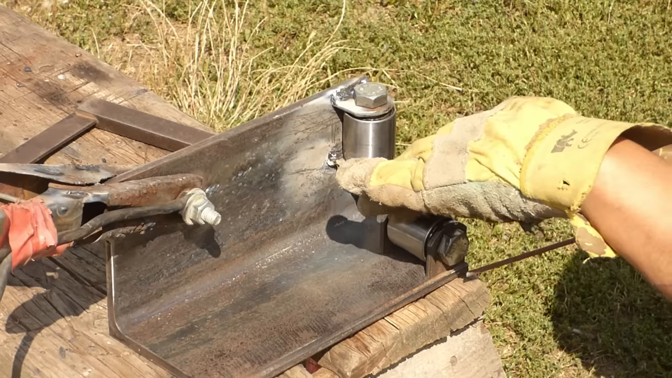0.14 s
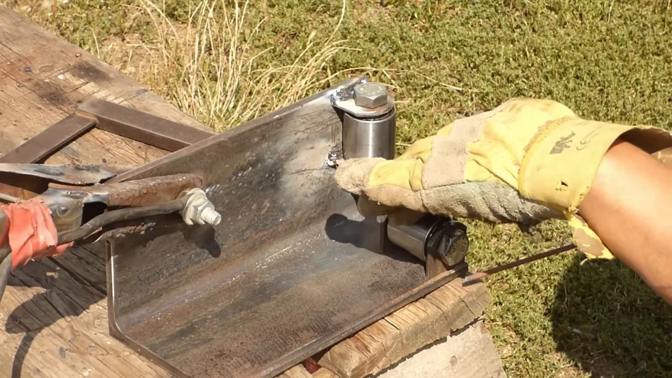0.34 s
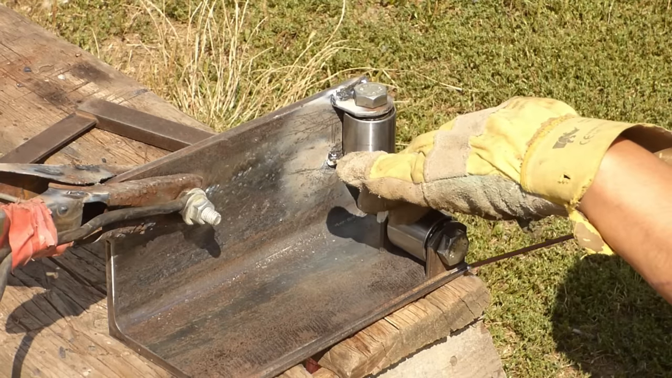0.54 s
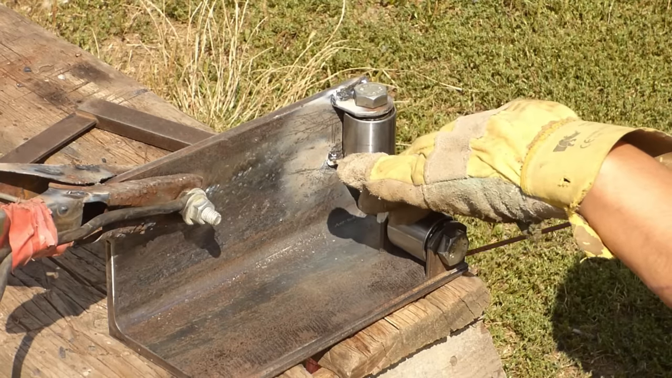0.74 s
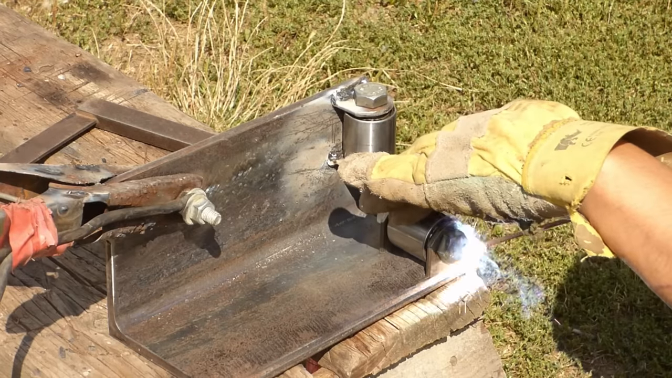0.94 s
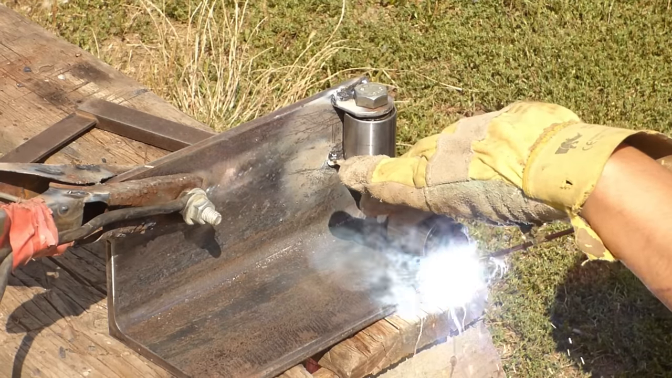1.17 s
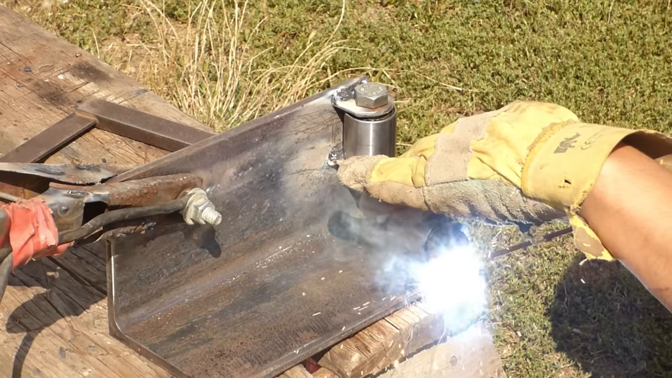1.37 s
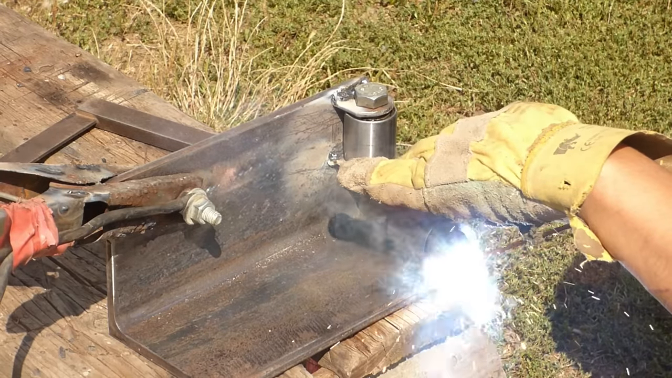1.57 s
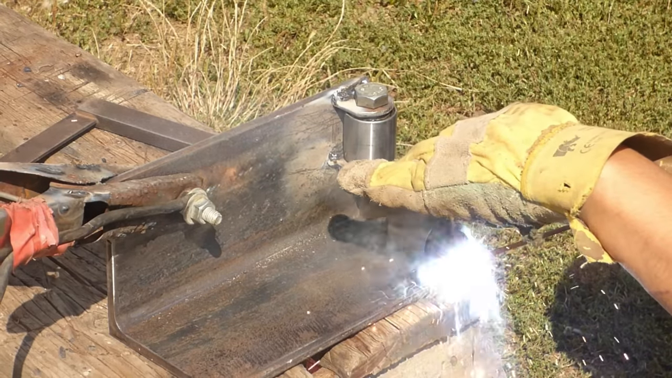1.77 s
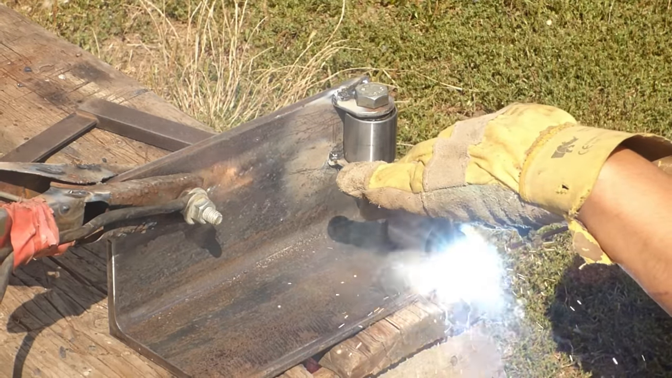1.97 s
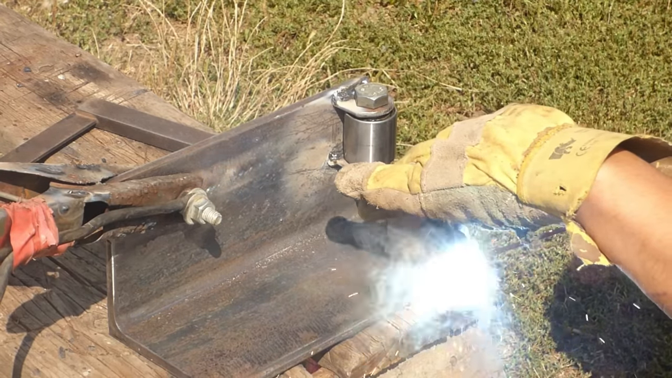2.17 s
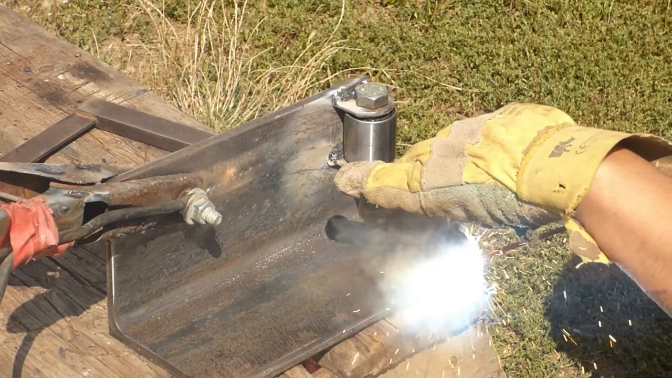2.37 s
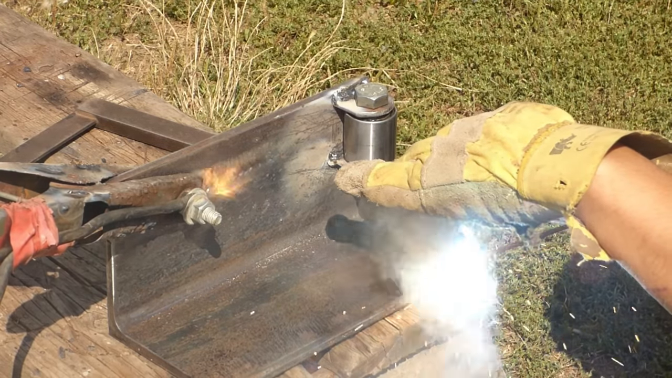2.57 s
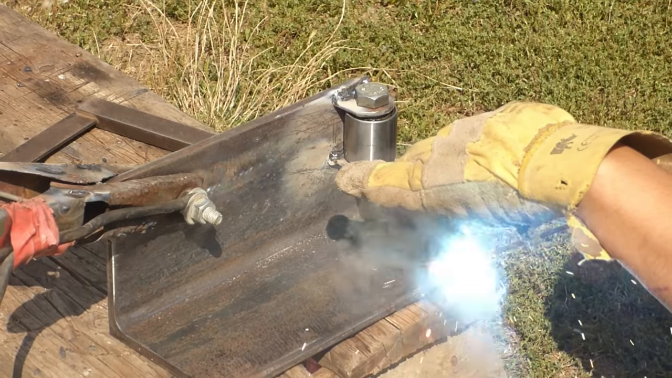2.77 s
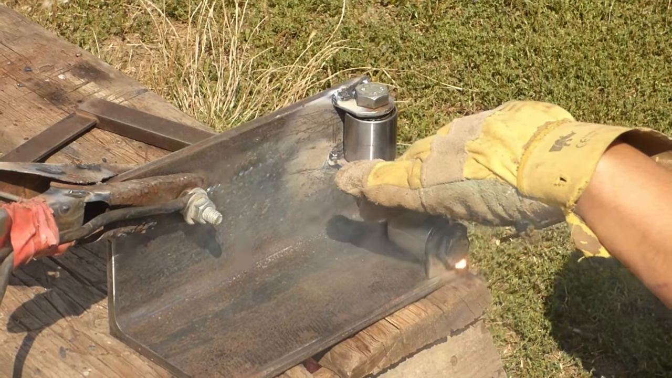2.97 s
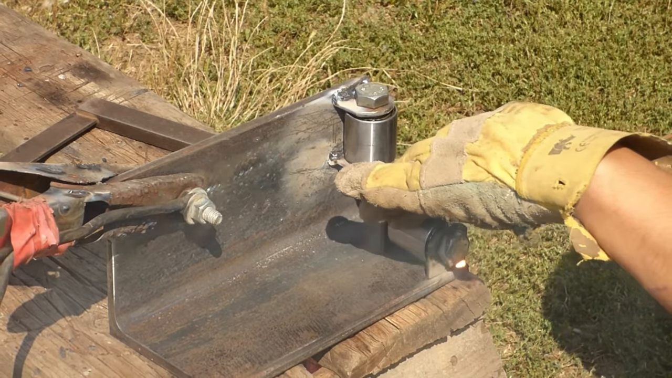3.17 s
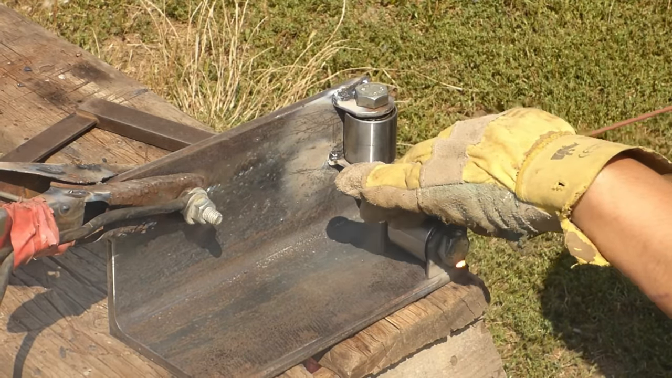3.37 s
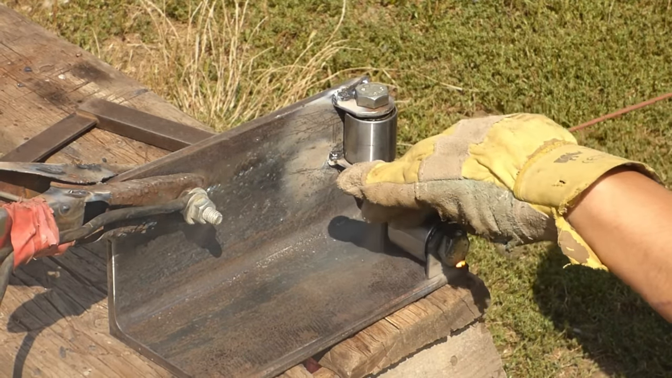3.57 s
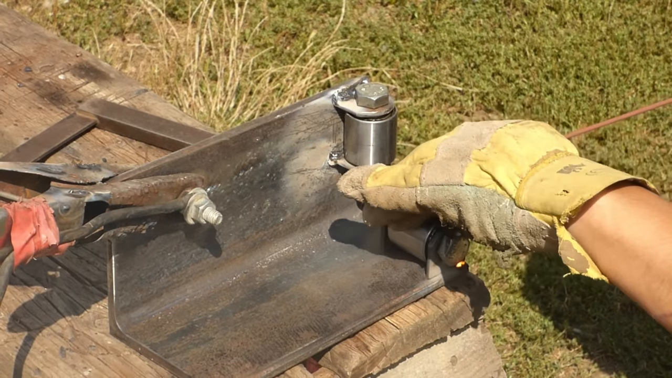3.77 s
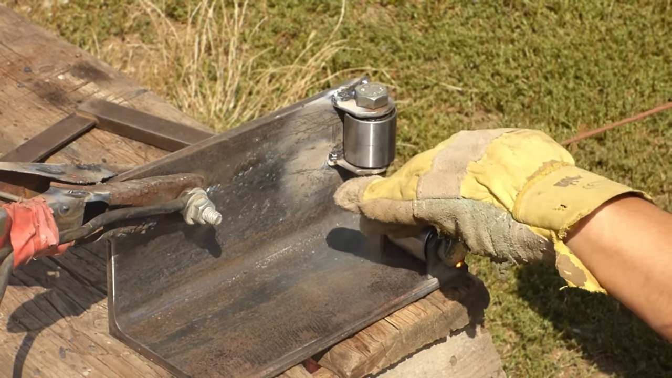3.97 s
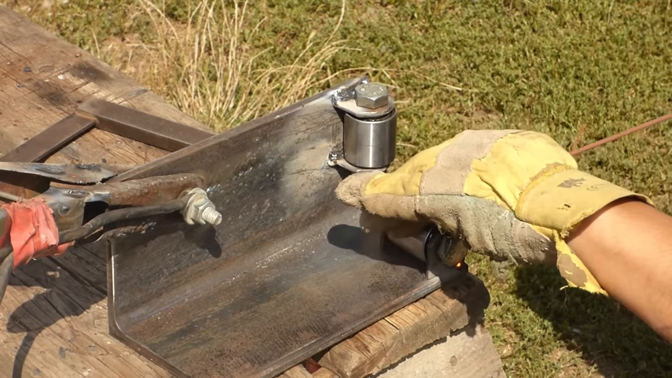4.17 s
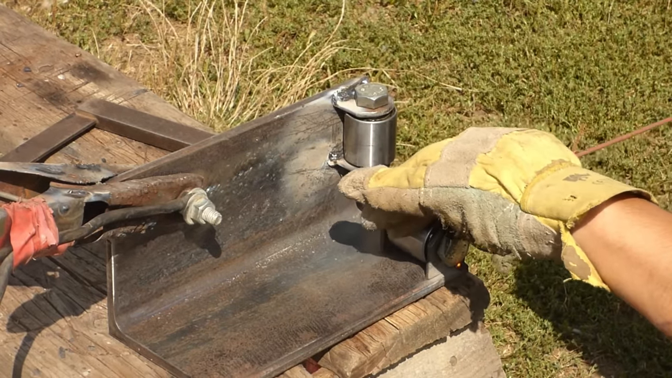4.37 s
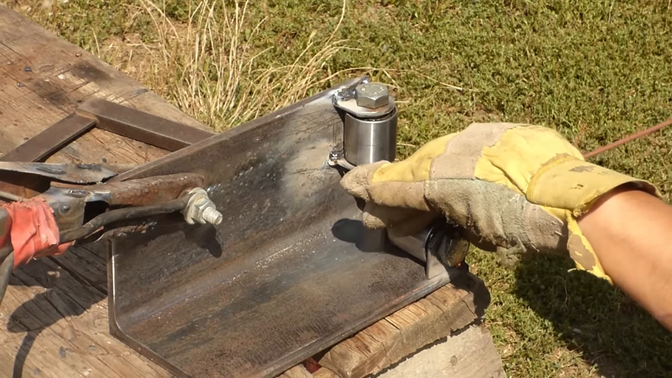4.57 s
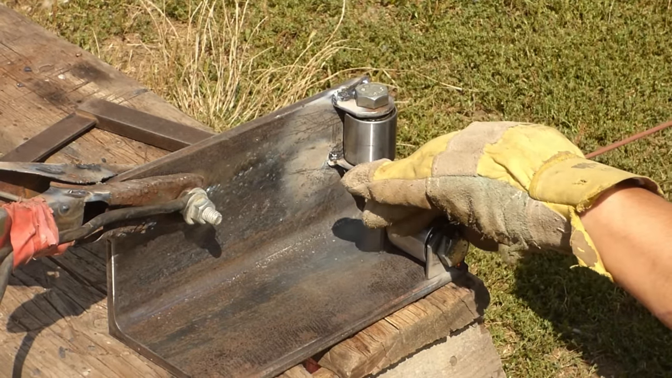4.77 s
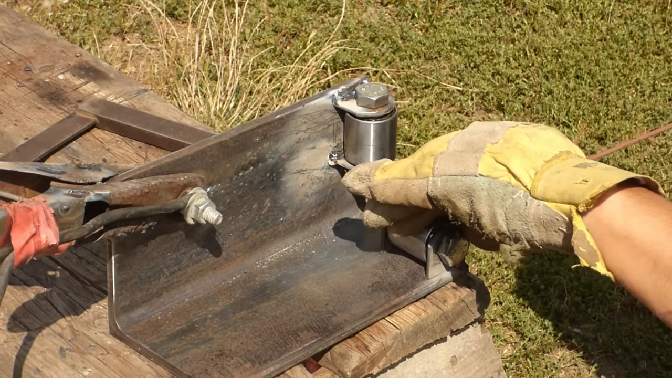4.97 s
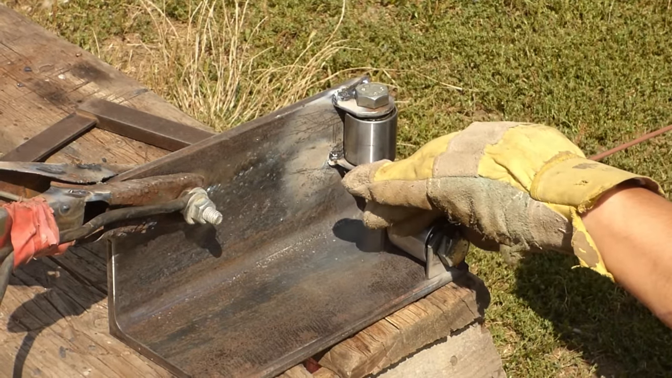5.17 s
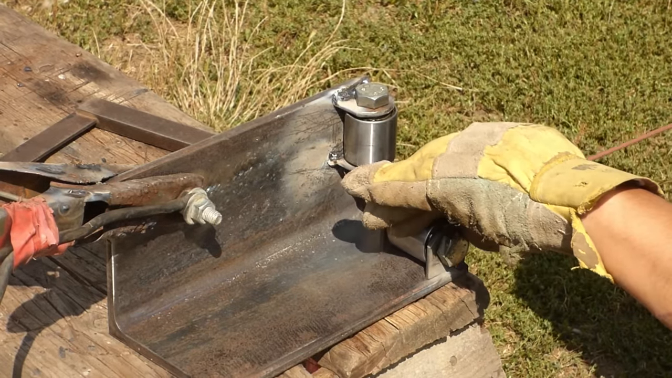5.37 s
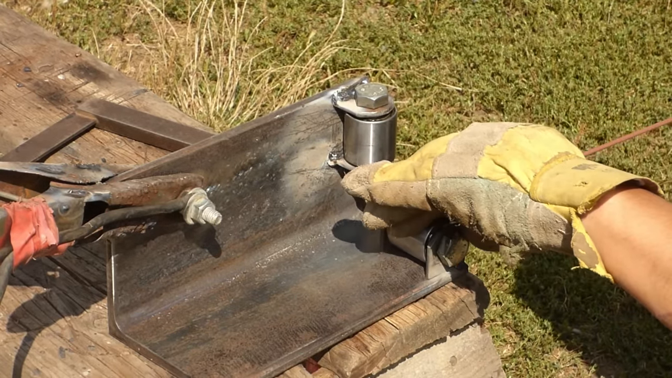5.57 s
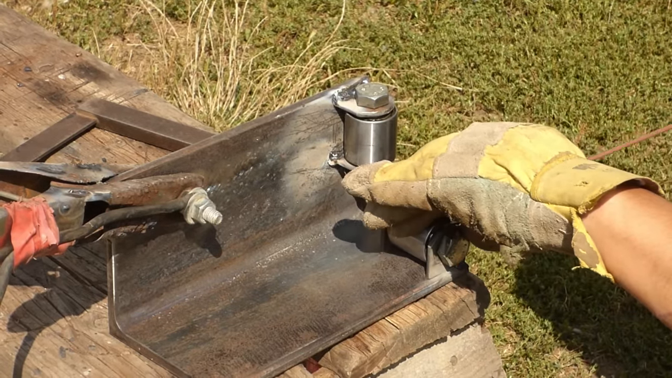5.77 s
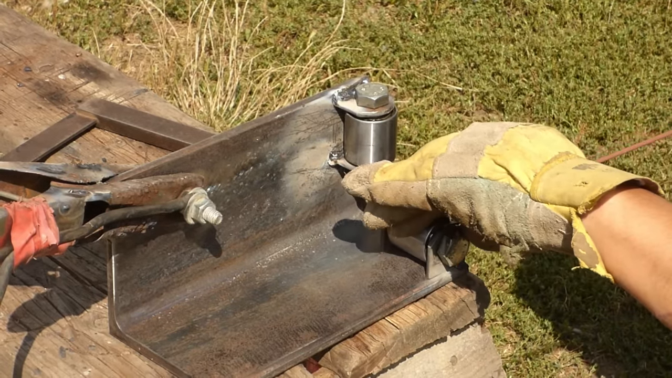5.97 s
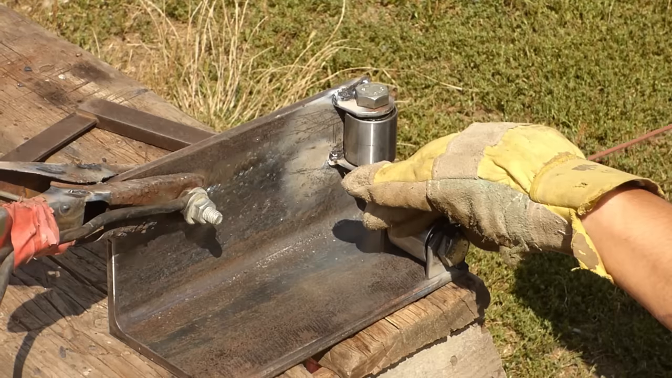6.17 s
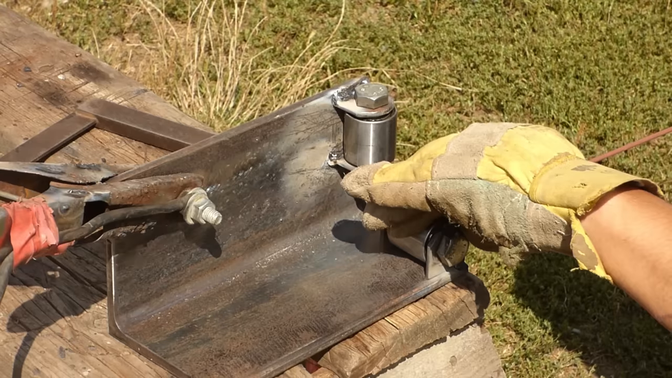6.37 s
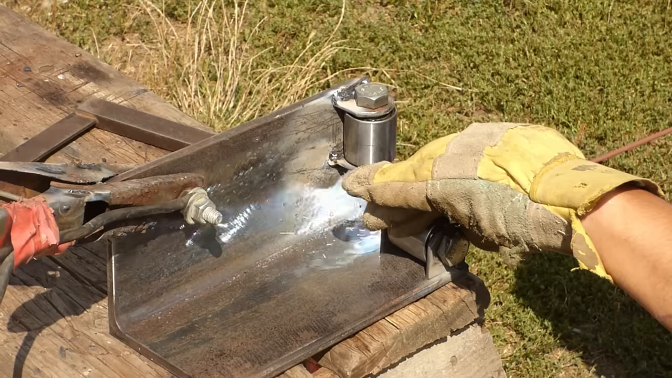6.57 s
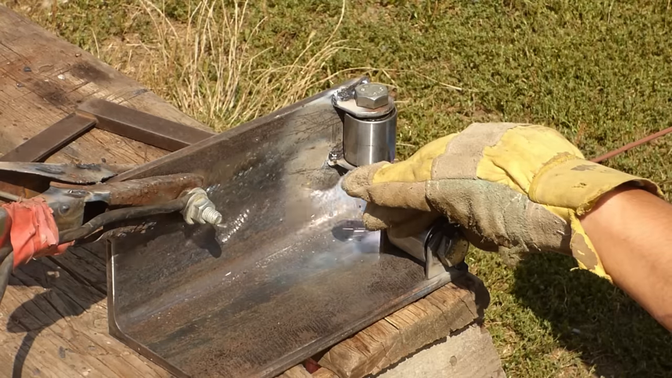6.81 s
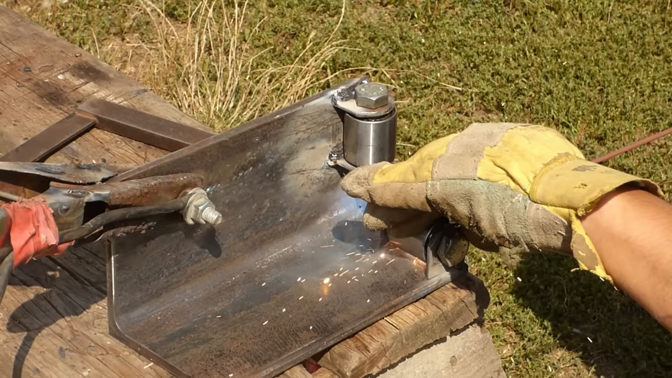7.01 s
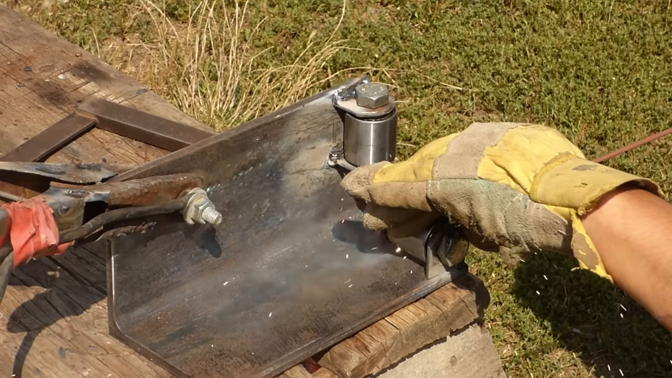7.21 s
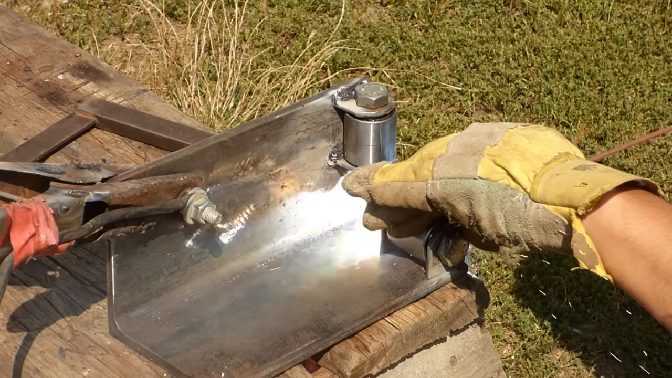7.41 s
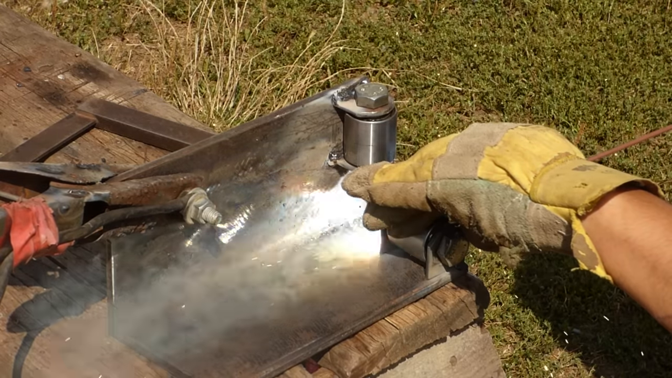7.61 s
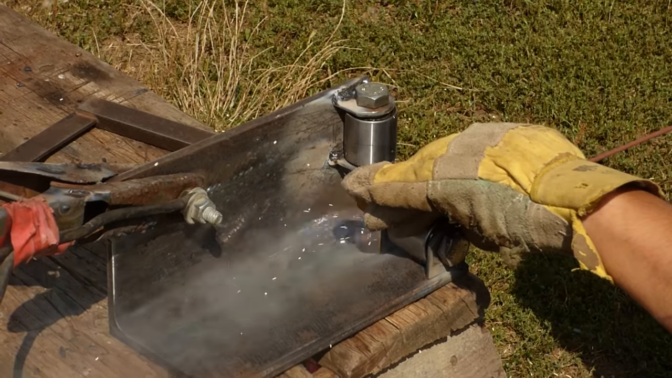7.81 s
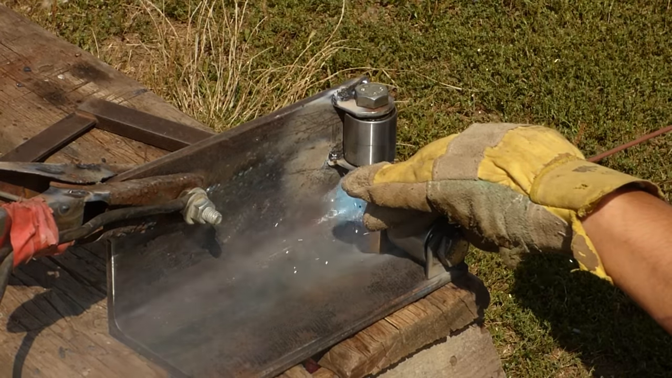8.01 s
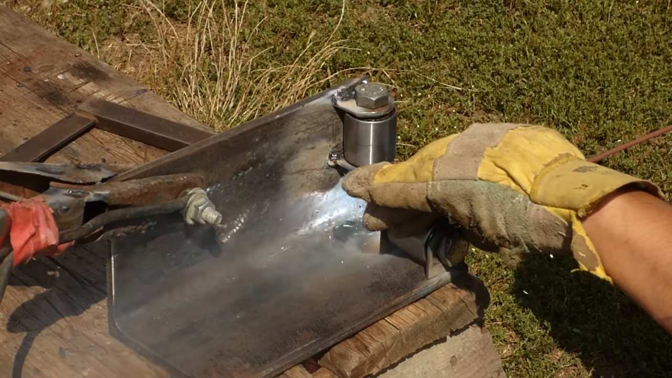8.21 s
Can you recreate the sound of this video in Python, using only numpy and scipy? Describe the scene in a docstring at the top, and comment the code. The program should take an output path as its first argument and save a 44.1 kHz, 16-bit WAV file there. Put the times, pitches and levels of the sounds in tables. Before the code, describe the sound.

Two stick welds on steel plate, heard from a close handheld stereo microphone in an open yard. A throbbing low fan hum runs throughout, dipping while the arcs burn. The first weld builds from uneven sputter to dense sizzling and popping, then stops abruptly. A quiet pause holds fading fizz, dull handling bumps and short metallic scratches. The second weld bursts in with crisp, bright, irregular snaps and gassy flares.

```python
"""A welding arc lays two short stick welds on a steel angle, outdoors, over a fan's steady drone.
Each arc is filtered hiss and spatter clicks with a gas roar; drops of metal snap as sprayed spikes with
a thump, and shorts dip the arc. Fan and yard air are coloured noise, the fan with wavering tones.
The rod scratches in short strokes of grains, slag fizzes as it cools, a far bird chirps in falling sines,
and the held microphone housing knocks, hums and rumbles."""
import sys
import numpy as np
from scipy import signal
from scipy.fft import rfft, irfft
from scipy.io import wavfile
from scipy.ndimage import uniform_filter1d

SR = 44100
rng = np.random.default_rng(int(sys.argv[2]) if len(sys.argv) > 2 else 0)


def master(y):
    """Save y as 16-bit WAV."""
    cut = np.clip(np.atleast_2d(y).T, -1, 1)
    pcm = np.round(cut * 32767)  # scale
    wavfile.write(sys.argv[1], SR, pcm.astype(np.int16))


N = 363825
TIME = np.arange(N) / SR  # s
FREQS = np.maximum(np.arange(4097) * SR / 8192, 1)  # Hz, kept above zero for the logarithm


def from_db(db):
    """Decibels to gain."""
    return 10 ** (np.asarray(db) / 20)


def rms_one(x):
    """Scale to rms 1."""
    return x / np.sqrt(np.mean(x ** 2) + 1e-20)


def in_time(rows):
    """Each column of an automation curve, at every sample."""
    s, *columns = np.transpose(rows)
    return [np.interp(TIME, s, column) for column in columns]


def drift(rate):
    """Smooth random modulation of spread 1; a higher rate wanders faster."""
    r = np.exp(-20 * np.pi * rate / SR)
    # made at a tenth of the sample rate, with the filter's start-up thrown away
    noise = rng.standard_normal(N // 10 + 4002)
    slow = signal.lfilter([1], [1, -2 * r, r * r], noise)[4000:]
    return np.interp(np.arange(N) / 10, np.arange(len(slow)), rms_one(slow))


def colour(x, spectrum, peaks=()):
    """Causal unit-energy filter: a smooth spectrum, falling above its last point, plus peaks and holes."""
    hz, db = np.transpose(spectrum)
    shape = np.interp(np.log(FREQS), np.log(hz), db)
    shape = shape - 20 * np.log2(np.maximum(FREQS / hz[-1], 1))
    for centre, width, height in peaks:
        shape = shape + height / (1 + (2 * (FREQS - centre) / width) ** 2)
    cepstrum = irfft(np.log(from_db(shape)))
    cepstrum[1:len(FREQS) - 1] *= 2  # folding the cepstrum gives minimum phase
    cepstrum[len(FREQS):] = 0
    response = irfft(np.exp(rfft(cepstrum)))
    return signal.fftconvolve(x, response / np.linalg.norm(response))[:N]


def split(x, hz):
    """The parts of a sound below and above a frequency."""
    bands = []
    for kind in ("low", "high"):
        section = signal.butter(2, hz, kind, fs=SR, output="sos")
        bands.append(signal.sosfilt(np.tile(section, (2, 1)), x))
    return bands


def add(track, s, sound):
    """Mix a short sound into a track at s seconds."""
    start = int(np.clip(s * SR, 0, N - 1))
    track[start:start + len(sound)] += sound[:N - start]


def grains(per_s, spread_db):
    """Random clicks, most small and a few large; rms 1."""
    sizes = from_db(spread_db * np.minimum(rng.exponential(1, N), 3.5))
    return rms_one((rng.random(N) < per_s / SR) * sizes * rng.choice([-1, 1], N))


def wide_noise(spectrum, side_db, peaks=()):
    """Steady stereo noise from independent mid and side; rms about 1."""
    mid, side = (colour(rng.standard_normal(N), spectrum, peaks) for _ in range(2))
    return mid + from_db(side_db) * side * np.array([[1], [-1]])


# the welds: (start [s], end [s], base gas roar [dB], mean centre of the snaps [Hz],
# small drops [per s], their mean level above the sizzle [dB], dip of the drone [dB])
WELDS = [(0.885, 2.91, -39.5, 7600, 45, 6, 3), (6.629, 8.3, -40, 9660, 22, 6.5, 8)]
# the drone before the welds dip it: (time [s], level [dB])
DRONE_LEVEL = [(0, -36.5), (5.75, -35.5), (5.9, -36.5)]
DRONE_LAG_S = 0.082  # time constant of its sinking and return


def drone_level():
    """The drone's gain: it sinks while an arc burns and comes back afterwards."""
    dip_db = sum(db * ((TIME > start) & (TIME < end)) for start, end, *_, db in WELDS)
    r = np.exp(-1 / (DRONE_LAG_S * SR))
    return from_db(in_time(DRONE_LEVEL)[0] - signal.lfilter([1 - r], [1, -r], dip_db))


# spectrum of the rushing air: (frequency [Hz], relative level per Hz [dB])
FAN_AIR = [(20, -21.5), (40, -34), (100, -20.5), (190, -11.5), (230, -6), (262, 4), (345, 3.5), (395, -7.5),
           (500, -6), (800, -18), (1500, -20), (2600, -31)]
# peaks and dips in the drone's spectrum: (frequency [Hz], width [Hz], height [dB])
DRONE_PEAKS = [(543, 66, -11), (607, 100, 6), (775, 67, 6), (1570, 59, -9)]
# wavering tones: (mean frequency [Hz], relative level [dB], wander [Hz])
FAN_TONES = [(265.6, -54, 2.6), (386, -61.5, 0.56), (603, -62, 7)]
# the drone as the yard scatters it: (frequency [Hz], relative level per Hz [dB])
SCATTERED = [(25, -8), (60, -6), (130, 0), (280, -22), (450, 2), (750, 12), (1400, 5.5), (3000, -10)]
THROB_PER_S, THROB_DB, THROB_WANDER = 10.3, 1.05, 0.076  # mean rate, depth, spread as a share of rate


def fan(flutter_db):
    """Air rushes through the welder's case, throbbing not quite evenly, with a few wavering tones."""
    throb_hz = THROB_PER_S * (1 + THROB_WANDER * drift(1))
    throb = np.sin(2 * np.pi * np.cumsum(throb_hz) / SR)
    air = wide_noise(FAN_AIR, side_db=-62, peaks=DRONE_PEAKS)
    air = air * from_db(THROB_DB * throb + flutter_db * drift(17.0))
    tones = 0
    for hz, db, wander_hz in FAN_TONES:
        phase = 2 * np.pi * np.cumsum(hz + wander_hz * drift(8.57)) / SR
        tones = tones + from_db(db) * (1 + .5 * drift(2.9)) * np.sqrt(2) * np.sin(phase)
    level = drone_level()
    # scattered by the yard, part of the drone comes from all sides
    scattered = colour(rng.standard_normal(N), SCATTERED) * np.array([[1], [-1]])
    drone = level * (from_db(-1.0) * air + from_db(-21.5) * scattered)
    return drone + level / level.max() * tones


# spectrum of the airy hiss: (frequency [Hz], relative level per Hz [dB])
OUTDOORS = [(800, 2), (2200, 1.5), (3000, 0.5), (4000, 2), (6000, -3.5), (9000, -7.5), (12000, -16),
            (15000, -23)]
# faint whistles in it: (frequency [Hz], width [Hz], height [dB])
WHISTLES = [(1760, 130, 6), (1960, 49, 8.5), (3030, 155, 7.5), (3210, 43, 5.5), (3810, 81, 6.5),
            (4200, 97, 3)]


def outdoor_air():
    """A steady, wide airy hiss whose narrow spectral peaks whistle faintly."""
    return from_db(-54) * wide_noise(OUTDOORS, side_db=-7.5, peaks=WHISTLES)


# strokes of the rod tip: (time [s], length [s], starting level [dB])
SCRATCHES = [(0.292, 0.024, -53), (.334, .004, -53), (.353, .004, -48), (.397, .003, -50),
             (0.672, .005, -50), (0.797, 0.085, -54), (3.32, .004, -51), (3.558, .005, -47),
             (5.321, 0.02, -55), (5.361, 0.015, -43.5), (5.721, 0.016, -43), (5.738, 0.014, -43),
             (6.008, 0.012, -40), (6.023, 0.014, -38), (6.038, 0.011, -45), (6.335, 0.0056, -40)]
# spectrum of the scratch, shared by the slag's fizz: (frequency [Hz], relative level per Hz [dB])
SCRATCH_COLOUR = [(1000, -13), (2800, 3), (4500, 1.5), (9500, 6), (12000, -4), (15500, -17)]
# the rod's ringing peaks and holes: (frequency [Hz], width [Hz], height [dB])
ROD = [(1980, 91, 23), (4080, 220, 10), (4500, 260, 8.5), (5070, 130, 6), (8100, 350, -7), (9100, 300, -2),
       (10900, 400, -7)]


def scratches():
    """The rod tip drags over rough steel in short strokes that start and stop abruptly."""
    force = 0
    for s, length, db in SCRATCHES:
        corners = [s, s + .001, s + length, s + length + .003]
        force = force + from_db(db) * np.interp(TIME, corners, [0, 1, .35, 0])
    return force * colour(grains(1500, 1.8), SCRATCH_COLOUR, ROD)


IGNITE_S, DIE_DB_PER_S = 0.011, 558  # an arc lights at once and fades fast when the rod is lifted


def lit(weld):
    """A weld's envelope: quick attack, hold, fast release."""
    start, end, *_ = weld
    attack = np.clip((TIME - start) / IGNITE_S, 0, 1)
    return attack * from_db(-DIE_DB_PER_S * np.clip(TIME - end, 0, 1))


# the flux coat flares up in a puff of gas: (time [s], half length [s], rise of the roar [dB])
FLARES = [(1.125, 0.061, 6.5), (1.183, 0.015, 10), (2.684, 0.023, 10.5), (2.919, 0.035, 13.5),
          (6.908, 0.024, 11), (7.527, 0.038, 6.5), (7.601, 0.14, 12.5), (7.86, 0.28, 1), (8.198, 0.027, 9)]
FLARE_SHAPE = 0.79  # exponent: how squarely a flare starts and stops (2 = bell)
ROAR_FOLLOWS = 0.34  # share of the sizzle's dB swing that the gas roar follows


def gas_level(weld, sizzle_db):
    """The roar in dB: it follows the arc and swells with each flare."""
    start, end, roar_db, *_ = weld
    swing_db = sizzle_db - sizzle_db[(TIME > start) & (TIME < end)].mean()
    flares_db = 0
    for s, half_s, db in FLARES:
        distance = np.minimum(np.abs((TIME - s) / half_s), 10)
        flares_db = flares_db + db * np.exp(-distance ** FLARE_SHAPE)
    return roar_db + ROAR_FOLLOWS * swing_db + flares_db


TOP_HZ = 11600  # where the top of the sizzle begins


def arc(weld, effort, sizzle_colour, roar_colour, hiss_db, spatter_db, spatter_per_s, spread_db,
        flutter_db, flutter_rate):
    """A fluttering plasma hisses, fine spatter crackles, and gas from the flux coat roars."""
    sizzle_db, bright_db, top_db = in_time(effort)
    flutter = drift(flutter_rate)
    hiss = from_db(hiss_db) * rng.standard_normal(N)
    spatter = from_db(spatter_db) * grains(spatter_per_s, spread_db)
    sizzle = colour((hiss + spatter) * rms_one(from_db(flutter_db * flutter)), sizzle_colour)
    # a tight arc shifts its power to the upper treble
    low, high = split(sizzle, hz=7250)
    bright = from_db(bright_db + 2.4 * drift(43))
    sizzle = (rms_one(low) + bright * rms_one(high)) / np.sqrt(1 + bright ** 2)
    body, top = split(sizzle, hz=TOP_HZ)
    sizzle = body + from_db(top_db) * top
    puffs = rms_one(from_db(1.0 * flutter + 1.8 * drift(45)))
    roar = colour(rng.standard_normal(N) * puffs, roar_colour)
    return lit(weld) * (from_db(sizzle_db) * sizzle + from_db(gas_level(weld, sizzle_db)) * roar)


# ignitions: (time [s], push before colouring [dB])
STRIKES = [(0.893, -7), (6.6353, -1.5)]
# spectrum of the push of air: (frequency [Hz], relative level per Hz [dB])
STRIKE_COLOUR = [(60, -12), (250, -25), (550, 2), (900, 2), (1500, 2), (2400, -13.5), (4000, -15.5)]


def strikes():
    """As the arc ignites, suddenly heated air gives one dull push."""
    pushes = np.zeros(N)
    for s, db in STRIKES:
        add(pushes, s, from_db([db]))
    return colour(pushes, STRIKE_COLOUR)


# a drop bridges the gap or the rod sticks in the pool: (start [s], end [s], change of arc level [dB])
SHORTS = [(1.068, 1.11, -3), (1.243, 1.263, -3), (1.507, 1.516, -8), (1.675, 1.693, -2),
          (1.517, 1.566, -1.5), (2.367, 2.383, -4), (6.771, 6.775, -14), (6.933, 6.936, -4),
          (6.941, 6.969, -8.5), (7.138, 7.157, -4.5), (7.274, 7.296, -31), (7.396, 7.427, -5.5),
          (7.766, 7.772, -11), (7.91, 7.922, -7), (8.003, 8.02, -1), (8.068, 8.085, -3), (8.106, 8.163, -1)]


def shorted_db():
    """How far the arc sinks while it is shorted, in dB."""
    return sum(db * ((TIME > start) & (TIME < end)) for start, end, db in SHORTS)


# big drops of metal bursting: (time [s], level [dB], thump relative to that level [dB])
BIG_DROPS = [(0.8933, -22.5, 7), (1.002, -16, -12), (1.003, -13, -25), (1.0112, -15, -13.5),
             (1.0163, -19, -8.5), (1.0228, -19, -11), (1.0346, -10, -19), (1.2065, -18, -8),
             (1.255, -20, -31), (1.2653, -8.5, -13), (1.3175, -13.5, -5), (1.326, -10.5, -6),
             (1.3307, -18, -16), (1.385, -21, -23), (1.4023, -11, -8.5), (1.4276, -17, -6),
             (1.4429, -9.5, -17), (1.5062, -18, -18), (1.5145, -10, -18), (1.5164, -12.5, -3.5),
             (1.5179, -15.5, -8), (1.601, -15, -10), (1.611, -9, -11), (1.6202, -9.5, -14),
             (1.651, -14, -7), (1.6728, -11, -6.5), (1.737, -21, -7), (1.8482, -13, -23),
             (1.8807, -8.5, -11), (1.9824, -15, -19), (1.995, -8.5, -21), (2.011, -16, -9),
             (2.0664, -10, -16), (2.1312, -21, -19), (2.1675, -22, -21), (2.236, -22, -5),
             (2.272, -10.5, -16), (2.3058, -13, -11.5), (2.3518, -9, -13), (2.4262, -11.5, -6.5),
             (2.4424, -9.5, -6), (2.469, -16, -13), (2.4969, -11.5, -20), (2.5981, -11, -7),
             (2.62, -18, -12), (2.629, -18, -10), (2.709, -11.5, -7), (2.747, -25, -5), (2.796, -21, -3),
             (6.6358, -14, -6.5), (6.6418, -5.5, -27), (6.6576, -4.5, -16), (6.69, -17.5, -27),
             (6.6965, -10, -19), (6.768, -12.5, -28), (6.7765, -12.5, -30), (6.7977, -7, -35),
             (6.8028, -9, -26), (6.8085, -17, -25), (6.8365, -19, -21), (6.839, -17, -30),
             (6.8994, -13, -12), (6.9038, -5.5, -20), (6.9175, -4, -18), (6.9284, -13, -25),
             (6.937, -7.5, -14), (6.9482, -14, -21), (6.973, -9, -26), (6.9771, -16, -22),
             (6.9847, -14, -24), (6.9915, -15, -26), (7.0005, -4.5, -20), (7.1028, -22, -11),
             (7.1393, -12.5, -9), (7.1403, -5.5, -9), (7.178, -15, -11), (7.183, -18, -13),
             (7.189, -20, -17), (7.2232, -10, -18), (7.2264, -9, -21), (7.2361, -5, -15.5),
             (7.2473, -13, -14), (7.2573, -15, -13), (7.2626, -9.5, -14), (7.2667, -9, -18),
             (7.272, -13, -21), (7.332, -5, -19), (7.3637, -8, -15), (7.3724, -8, -22), (7.3895, -6.5, -16),
             (7.394, -15, -13), (7.424, -9.5, -27), (7.4376, -17, -26), (7.4493, -18.5, -14),
             (7.4586, -18, -16), (7.462, -11, -11), (7.4678, -18, -6), (7.683, -12, -7), (7.6946, -9.5, -7),
             (7.6945, -6.5, -5.5), (7.7369, -14.5, -6), (7.7435, -16, -20), (7.774, -13, -25),
             (7.7784, -18, -13), (7.7861, -18, -20), (7.815, -14.5, -10), (7.8222, -14, -10),
             (7.8506, -15, -12), (7.8525, -9.5, -12), (7.8708, -13.5, -14), (7.884, -13.5, -24),
             (7.8964, -17.0, -10), (7.9153, -16, -21), (7.9238, -13.5, -10.5), (7.927, -15, -16),
             (7.95, -14, -12), (7.962, -13, -17), (7.9735, -15, -6), (7.995, -16, -7), (8.021, -18, -9),
             (8.0407, -18.5, -6), (8.0651, -16.5, -6), (8.0886, -14.5, -8.5), (8.099, -15, -11),
             (8.1011, -25, -15), (8.1094, -19, -6), (8.123, -21, -6), (8.168, -22, -12), (8.1773, -15, -20),
             (8.186, -15, -19), (8.2, -12.5, -6), (8.207, -16, -6), (8.2222, -19, -24), (8.2278, -14, -9)]
SNAP_SCATTER_HZ = 550  # no two drops ring alike
SMALL_THUMP_DB, SMALL_SCATTER_DB = -6, 2.5  # mean thump relative to level; scatter of level and thump


def drops_of(weld, effort):
    """A weld's big drops and random small ones that grow with the arc: (s, level dB, Hz, thump dB)."""
    start, end, _, hz, per_s, small_db, _ = weld
    arc_db = in_time(effort)[0] + shorted_db()
    falls = np.flatnonzero((rng.random(N) < per_s / SR) & (TIME > start) & (TIME < end))
    scatter_db = SMALL_SCATTER_DB * rng.standard_normal((len(falls), 2))
    rows = [row for row in BIG_DROPS if start - .1 < row[0] < end]
    for i, (size, gas) in zip(falls, scatter_db):
        rows.append((TIME[i], arc_db[i] + small_db + size, SMALL_THUMP_DB + gas))
    detunes = SNAP_SCATTER_HZ * rng.standard_normal(len(rows))
    return [(s, db, hz + detune, thump) for (s, db, thump), detune in zip(rows, detunes)]


# a falling drop bridges the gap and dims the arc; when it bursts the arc surges back and settles
BRIDGE_S, BRIDGE_DB, SURGE_S, SURGE_DB = 0.0042, -2, 0.003, 1.3


def burning(drops):
    """The arc's gain: it sinks in each short, dims before each drop and surges after it."""
    dim_db, surge_db = np.zeros(N), np.zeros(N)
    surge = SURGE_DB * np.exp(-TIME[:SR // 10] / SURGE_S)
    for s, *_ in drops:
        dim_db[int((s - BRIDGE_S) * SR):int(s * SR)] = BRIDGE_DB
        add(surge_db, s, surge)
    return from_db(uniform_filter1d(shorted_db() + dim_db + surge_db, size=40))


# spectrum of the gas thump: (frequency [Hz], relative level per Hz [dB])
THUMP_COLOUR = [(60, -13.5), (200, -13.5), (450, -7), (1100, -1.5), (2200, -1), (4000, -3.5), (9000, -17)]
# each burst has a faint tick about a millisecond before it: median lead, level against the burst
LEAD_TICK_S, LEAD_TICK_DB = 0.0011, -13.5


def snaps(rows, snap_colour, spray_db, spray_s, tail_db, width_hz, crack_db, thump_db, bubble_hz):
    """After a faint tick, each drop bursts: a pressure spike, a spray of sparks and a thump of gas."""
    cracks, thumps = np.zeros(N), np.zeros(N)
    t = TIME[:600]
    r = np.exp(-np.pi * width_hz / SR)
    for (s, db, hz, thump), noise in zip(rows, rng.standard_normal((len(rows), len(t)))):
        spray = noise * (np.exp(-t / spray_s) + from_db(tail_db) * np.exp(-t / 0.0024))
        burst = from_db(spray_db) * spray / np.linalg.norm(spray)
        burst[0] = 1  # the pressure spike
        burst *= from_db(db) * np.sqrt(SR / 1000) / np.linalg.norm(burst)
        strength = np.linalg.norm(burst)
        crack = signal.lfilter([1, 0, -1], [1, -2 * r * np.cos(2 * np.pi * hz / SR), r * r], burst)
        add(cracks, s, crack * strength / np.linalg.norm(crack))
        add(cracks, s - LEAD_TICK_S * np.exp(.5 * noise[0]), from_db([LEAD_TICK_DB]) * strength)
        # a bigger bubble of gas thumps louder and duller
        edge_hz = np.clip(bubble_hz / from_db(thump), 500, 9000)
        low_pass = signal.butter(2, edge_hz, fs=SR)
        add(thumps, s, from_db(thump) * signal.lfilter(*low_pass, burst))
    cracks = from_db(crack_db) * colour(cracks, snap_colour)
    return cracks + from_db(thump_db) * colour(thumps, THUMP_COLOUR)


# how hard and how tight the first arc burns:
# (time [s], sizzle level [dB], mean brightness [dB], gain of the top treble [dB])
FIRST_ARC = [(0.9, -41.5, -3, 11), (0.985, -47, -1, 17), (1.04, -37.5, -3, 16), (1.08, -38.5, -9, 14),
             (1.125, -34.5, -9, 18), (1.165, -37.5, -1, 14), (1.19, -31.5, 0, -9), (1.24, -33.5, 5, -2),
             (1.29, -30, 0, -3), (1.4, -31.5, 0.5, -1), (1.72, -30.5, 0, -7), (1.92, -25.5, 7, -10),
             (2.28, -29.5, 6.5, 2.5), (2.56, -30, -0.5, -1), (2.8, -29.5, 0, -5), (2.89, -29, -1.5, 6.5)]
# spectra of sizzle, roar and snaps: (frequency [Hz], relative level per Hz [dB])
SIZZLE_FIRST = [(1200, -28), (2500, -3), (4000, -1), (6000, -1), (8000, -3.5), (9500, -7), (11500, -5.5),
                (14000, -15), (15500, -27)]
ROAR_FIRST = [(30, -27), (100, -12.5), (400, -0.5), (800, 1), (1300, 0), (2300, -3), (3500, -8),
              (6000, -37)]
SNAP_FIRST = [(300, -17), (1500, -16), (2800, 1.5), (4500, 1), (6000, 2), (9000, 0), (12000, 1),
              (16000, -5)]
# an even spectrum to carry peaks and holes: (frequency [Hz], relative level [dB])
FLAT = [(1, 0), (20000, 0)]
# fixed peaks and holes in the first arc's spectrum, the deepest near 1.57 kHz:
# (frequency [Hz], width [Hz], height [dB])
FIRST_PEAKS = [(1567, 166, -26), (2930, 56, -2), (3323, 92, -14), (3630, 97, -8), (3940, 230, 2.5),
               (4410, 250, -5.5), (4760, 350, 4), (5380, 71, -3), (5810, 150, -10), (6550, 740, -5.5),
               (7240, 130, -8), (7500, 410, 4), (9100, 300, 4), (11040, 250, -7), (11760, 360, -10),
               (13300, 550, -7)]


def first_weld(drops, sputter):
    """The first arc and its drops, heard through fixed spectral peaks and holes."""
    burn = arc(WELDS[0], FIRST_ARC, SIZZLE_FIRST, ROAR_FIRST, hiss_db=-10.0, spatter_db=-8.5,
               spatter_per_s=2200, spread_db=3.5, flutter_db=1.0, flutter_rate=54)
    bursts = snaps(drops, SNAP_FIRST, spray_db=4.0, spray_s=0.00033, tail_db=-10, width_hz=6600,
                   crack_db=-5.0, thump_db=-1.0, bubble_hz=1550)
    return colour(sputter * burn + bursts, FLAT, FIRST_PEAKS)


def slag(start_s, level_db, cooling_s):
    """The fresh bead fizzes in fine grains, fading as it cools."""
    fade = (TIME > start_s) * np.exp(-np.abs(TIME - start_s) / cooling_s)
    return from_db(level_db) * fade * colour(grains(5600, 3.0), SCRATCH_COLOUR)


# dull knocks in the microphone housing: (time [s], level [dB])
KNOCKS = [(3.9935, -34), (4.8732, -33), (4.996, -45), (5.4765, -34), (6.3165, -38)]
# its modes: (frequency [Hz], relative level [dB], time to fall 60 dB [s])
HOUSING = [(780, -1, 0.097), (1090, -1, 0.028), (1280, -3, 0.058), (1780, -6, 0.025)]
# spectrum of the rumble: (frequency [Hz], relative level per Hz [dB])
RUMBLE = [(30, -6), (110, 4), (200, 0), (300, -19)]
# when the housing hums, and when it rumbles under the hand: start and end in s
HUM_SPAN, RUMBLE_SPAN = (3.85, 4.8), (4.1, 5.72)


def soft_gate(start, end):
    """A gate open between two times, with smoothed edges."""
    return uniform_filter1d(1. * ((TIME > start) & (TIME < end)), size=4000)


def housing(hum_hz, hum_db, rumble_db):
    """The held housing knocks, hums and rumbles, shaking the two capsules in opposite directions."""
    knocks, t = np.zeros(N), TIME[:SR // 5]
    ring = 0
    for k, (hz, db, t60) in enumerate(HOUSING):
        ring = ring + from_db(db - 60 * t / t60) * np.sin(2 * np.pi * hz * t) * (-1) ** k
    for s, db in KNOCKS:
        add(knocks, s, from_db(db) * ring)
    hum = (1 + .4 * drift(12)) * np.sin(2 * np.pi * np.cumsum(hum_hz + 6 * drift(15)) / SR)
    hum = from_db(hum_db) * soft_gate(*HUM_SPAN) * hum
    rumble = colour(rng.standard_normal(N), RUMBLE) * from_db(4 * drift(10))
    rumble = from_db(rumble_db) * soft_gate(*RUMBLE_SPAN) * rumble
    return (knocks + hum + rumble) * np.array([[1], [-1]])


# falling chirps: (time [s], length [s], start frequency [Hz], end frequency [Hz], relative level [dB])
CHIRPS = [(4.737, 0.029, 5100, 3700, -48), (4.792, 0.036, 5000, 4450, -52), (4.845, .022, 5000, 4500, -50)]


def bird():
    """Quick falling chirps, roughened by distance, each followed by a weak echo."""
    out = np.zeros(N)
    for s, length, start_hz, end_hz, db in CHIRPS:
        hz = np.geomspace(start_hz, end_hz, int(length * SR))
        envelope = from_db(db) * np.sqrt(2 * np.hanning(len(hz)))
        whistle = envelope * np.sin(2 * np.pi * np.cumsum(hz) / SR)
        add(out, s, whistle)
        add(out, s + 0.018, from_db(-13) * whistle)
    return out * (0.4 + 0.47 * drift(300))


# how hard and how tight the second arc burns:
# (time [s], sizzle level [dB], mean brightness [dB], gain of the top treble [dB])
SECOND_ARC = [(6.64, -26.5, 0, -3), (6.69, -26.5, 16, -5), (6.77, -29.5, 9, -3), (6.79, -29.5, 12, -2),
              (6.88, -28.5, 5, 2), (7.06, -27.5, 4, -4), (7.12, -34.5, -0.5, 2), (7.33, -27.5, 3, -4),
              (7.43, -34, -9, 9), (7.47, -29.5, 1, -6), (7.55, -33.5, 3, -16), (7.62, -30.5, 1, -11),
              (7.66, -27, 2, -7), (7.74, -30.5, 3, 0), (7.879, -32, 4, 3), (7.94, -31, 7.5, 1),
              (8.14, -33.5, -1, 1), (8.2, -28.5, 2, 3), (8.25, -35.5, 6, 1)]
# spectra of sizzle, roar and snaps: (frequency [Hz], relative level per Hz [dB])
SIZZLE_SECOND = [(1200, -22), (2800, -21), (4700, -2), (5700, -8), (7000, 0.5), (9000, -5), (11500, 0),
                 (13500, -3), (15500, -16)]
ROAR_SECOND = [(30, -22), (100, -11), (400, -5.5), (850, -5), (1200, 1), (2100, 0.5), (2900, -5),
               (4000, -6), (6000, -15)]
SNAP_SECOND = [(300, -23), (2000, -34), (4300, -7), (5600, 1), (7000, 2.5), (9000, -2.5), (12000, 4.5),
               (16000, -4.5)]
# the glove in front of the arc shades its middle: (frequency [Hz], width [Hz], height [dB])
SHADE = [(3560, 2100, -2.5), (4640, 710, -8.5), (5520, 1800, 7.5)]
# ringing of the narrow gap deep in the joint: (frequency [Hz], width [Hz], height [dB])
GAP = [(4120, 680, 7), (5400, 520, -7.5), (6750, 1040, -15), (7970, 1800, 6.5), (9100, 1400, 7.5),
       (10700, 1200, 5.5), (11800, 1300, -9), (14800, 2500, 2.5)]
# how deep the arc sits in the joint: (time [s], depth [0-1])
DEPTH = [(6.88, 0.33), (6.9, 0.92), (7.08, 0.9), (7.12, 0), (7.2, 0.66), (7.23, 0.68), (7.42, 1),
         (7.47, 0.4), (7.7, 0.15)]


def second_weld(drops, sputter):
    """The second arc and its drops burn behind the glove and ring in the gap when deep in the joint."""
    burn = arc(WELDS[1], SECOND_ARC, SIZZLE_SECOND, ROAR_SECOND, hiss_db=0.0, spatter_db=1.0,
               spatter_per_s=2600, spread_db=2.5, flutter_db=2.5, flutter_rate=170)
    bursts = snaps(drops, SNAP_SECOND, spray_db=0.0, spray_s=0.00034, tail_db=-25, width_hz=6400,
                   crack_db=-5.0, thump_db=-0.5, bubble_hz=1700)
    shaded = colour(sputter * burn + bursts, FLAT, SHADE)
    depth = np.clip(in_time(DEPTH)[0], 0, 1)
    return (1 - depth) * shaded + from_db(-1.5) * colour(depth * shaded, FLAT, GAP)


def yard(x, near_db, near_s, far_db, far_t60):
    """Quick reflections off plate and bench and a short outdoor tail, different at each ear."""
    t = TIME[:SR // 3]
    turn = 2 * np.pi * drift(2.11)
    out = x
    # as the arc wanders over the pool, one pattern of reflections gives way to another
    for share in (np.cos(turn), np.sin(turn)):
        near, far = rng.standard_normal((2, 2, len(t))) * (t > .0003)
        near = rms_one(near * np.exp(-t / near_s))
        far = rms_one(signal.lfilter([1], [1, -.45], far) * from_db(-60 * t / far_t60))
        response = (from_db(near_db) * near + from_db(far_db) * far) / np.sqrt(len(t))
        out = out + signal.fftconvolve((share * x)[None], response, axes=1)[:, :N]
    return out


def scene():
    """Both welds and the small sounds at the bench, over fan and outdoor air."""
    first_drops = drops_of(WELDS[0], FIRST_ARC)
    second_drops = drops_of(WELDS[1], SECOND_ARC)
    sputter = burning(first_drops + second_drops)
    bench = scratches() + first_weld(first_drops, sputter) + strikes()
    bench = bench + slag(start_s=2.84, level_db=-48.0, cooling_s=0.22) + bird()
    bench = bench + second_weld(second_drops, sputter)
    held = housing(hum_hz=800, hum_db=-59, rumble_db=-69)
    reflected = yard(bench, near_db=-9.0, near_s=0.0045, far_db=-18.5, far_t60=0.3)
    return reflected + fan(flutter_db=0.45) + outdoor_air() + held


CUTOFF_HZ = 15900


def record(dry):
    """The right side is a touch louder, peaks are rounded, a small offset sits below zero, the top is cut."""
    top = 0.88
    heard = top * np.tanh(dry * from_db([[-.17], [.17]]) / top)
    heard = heard - .0033
    return signal.sosfilt(signal.ellip(10, .1, 80, CUTOFF_HZ, fs=SR, output="sos"), heard)


dry = scene()
out = record(dry)
master(out)
```